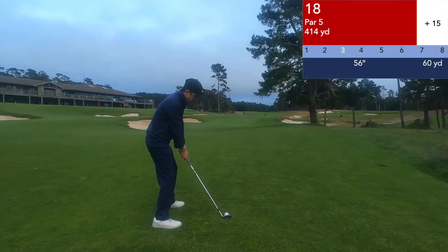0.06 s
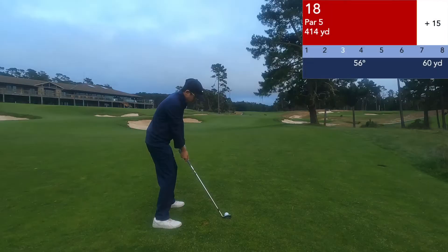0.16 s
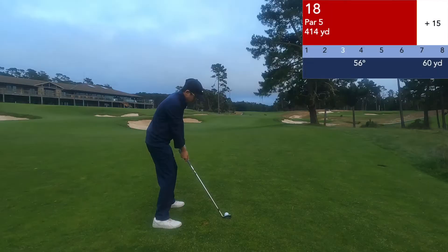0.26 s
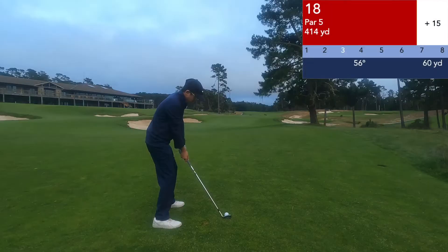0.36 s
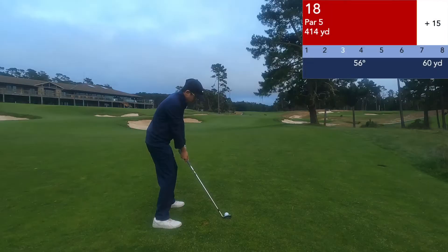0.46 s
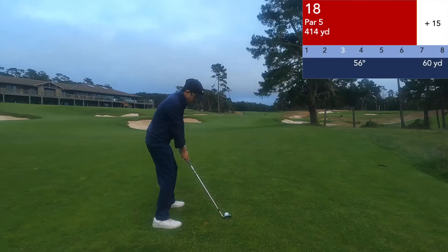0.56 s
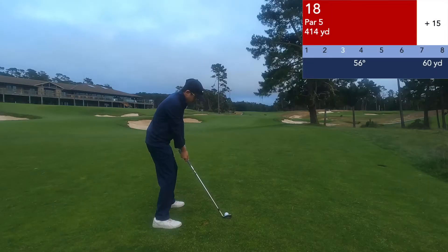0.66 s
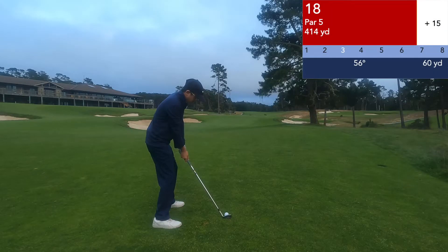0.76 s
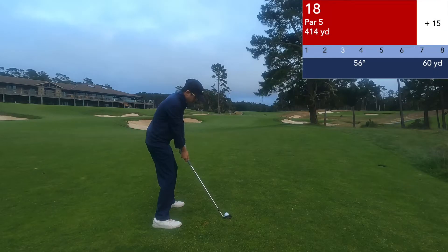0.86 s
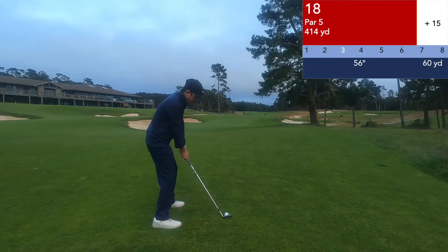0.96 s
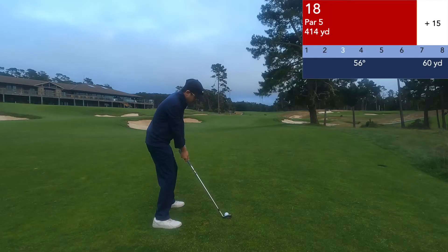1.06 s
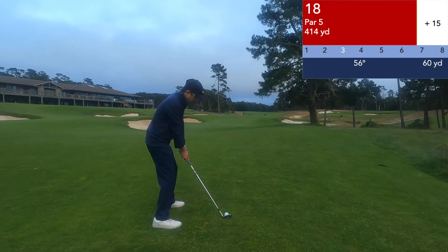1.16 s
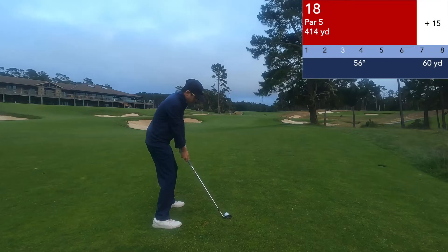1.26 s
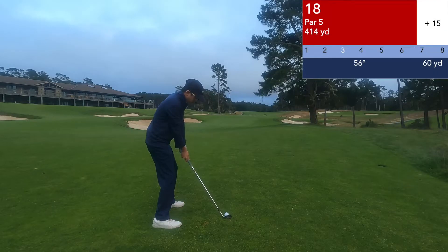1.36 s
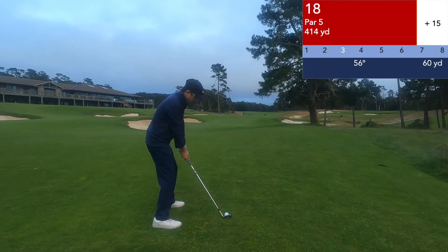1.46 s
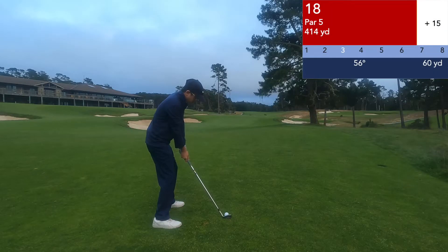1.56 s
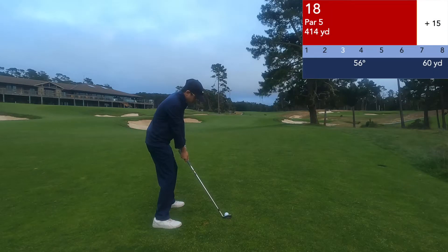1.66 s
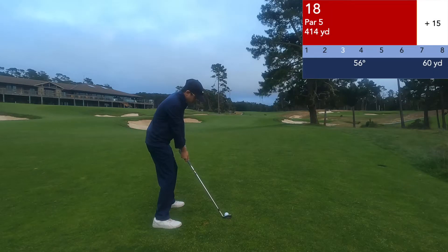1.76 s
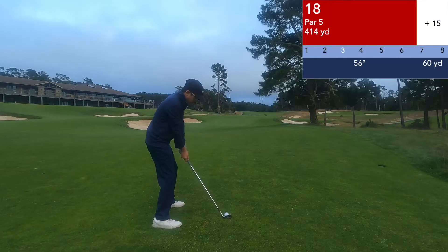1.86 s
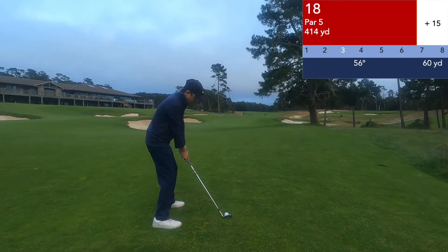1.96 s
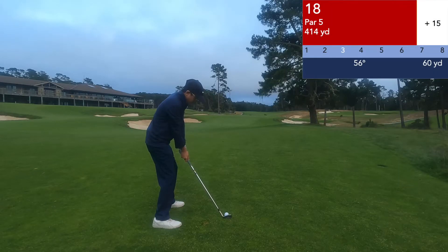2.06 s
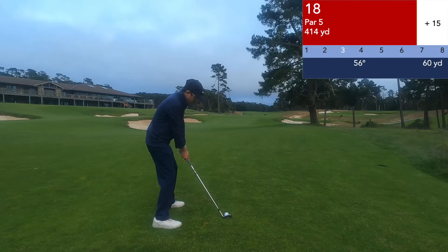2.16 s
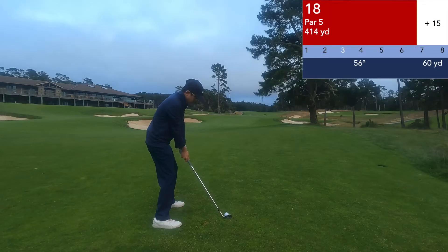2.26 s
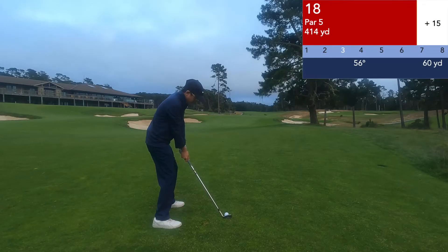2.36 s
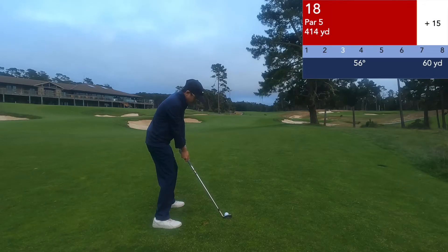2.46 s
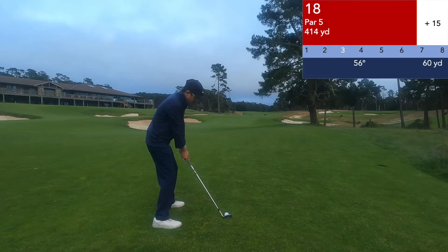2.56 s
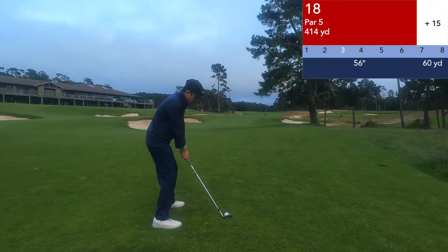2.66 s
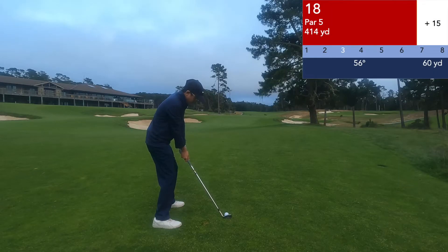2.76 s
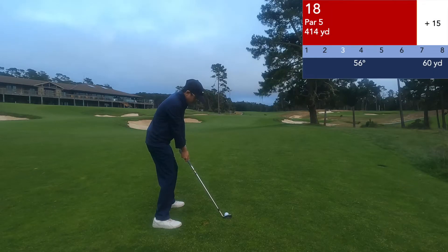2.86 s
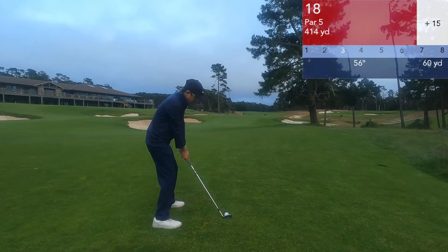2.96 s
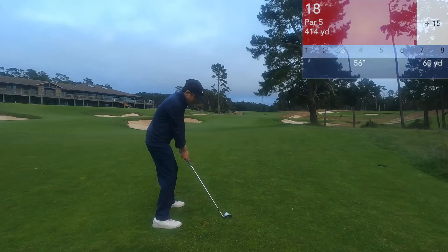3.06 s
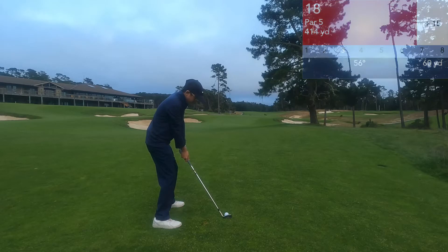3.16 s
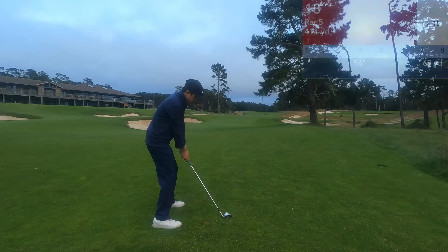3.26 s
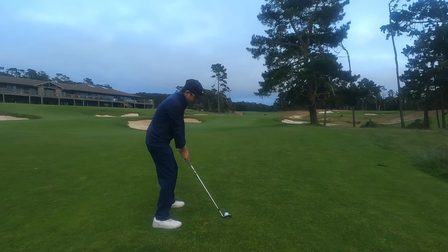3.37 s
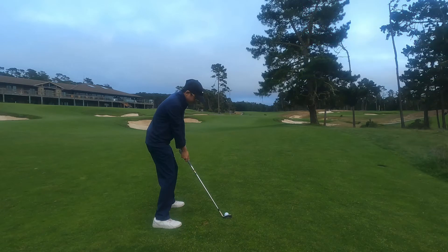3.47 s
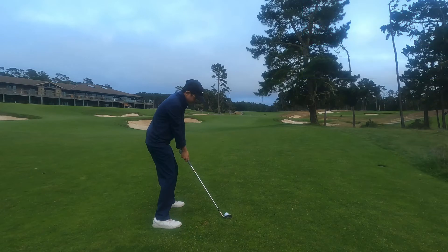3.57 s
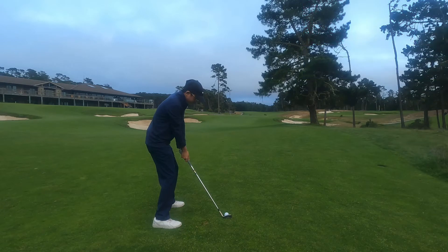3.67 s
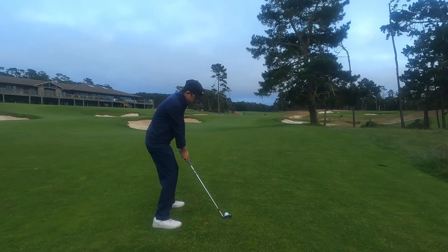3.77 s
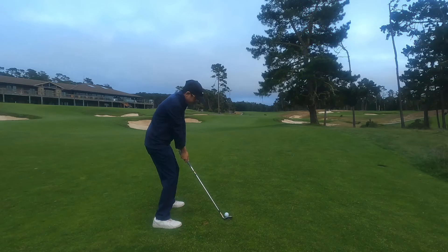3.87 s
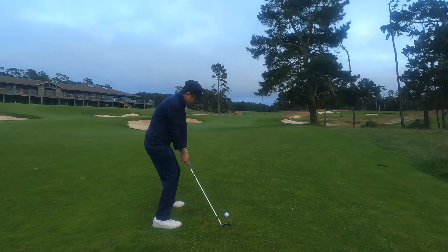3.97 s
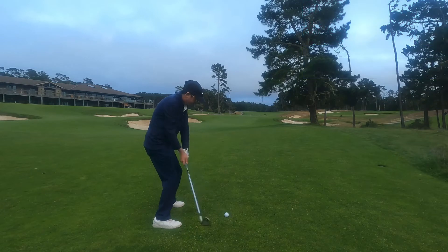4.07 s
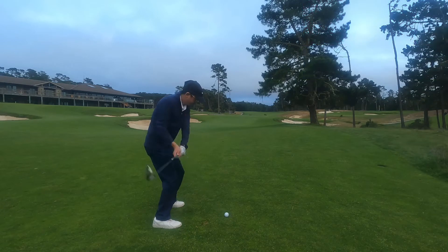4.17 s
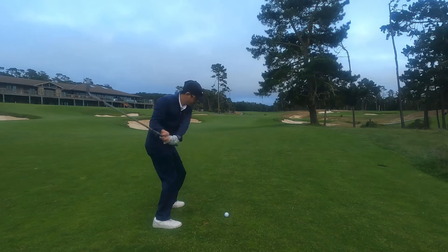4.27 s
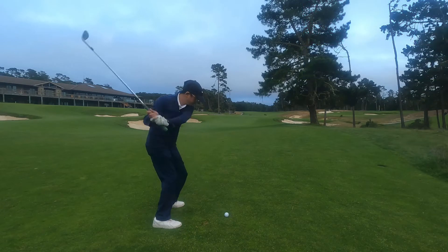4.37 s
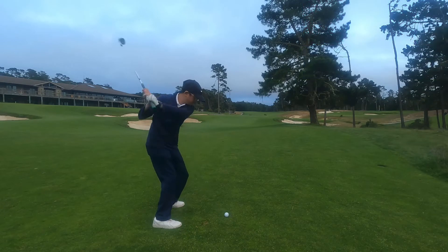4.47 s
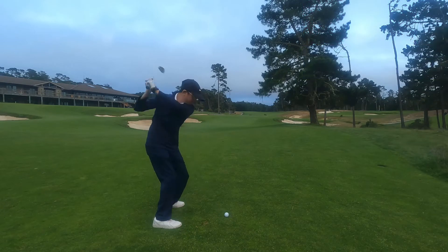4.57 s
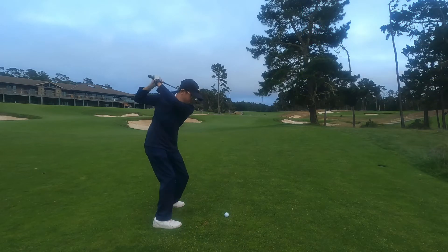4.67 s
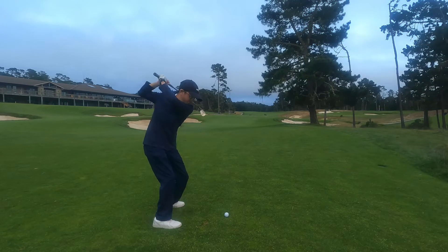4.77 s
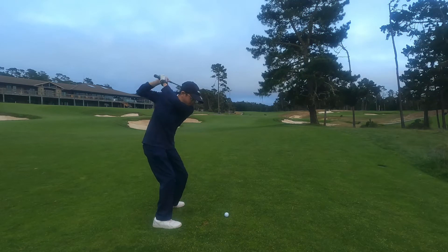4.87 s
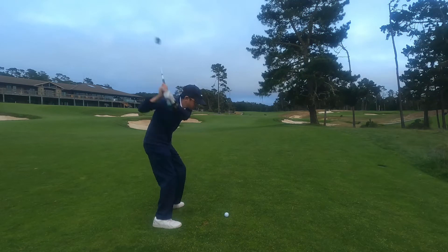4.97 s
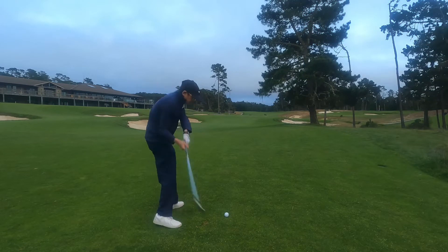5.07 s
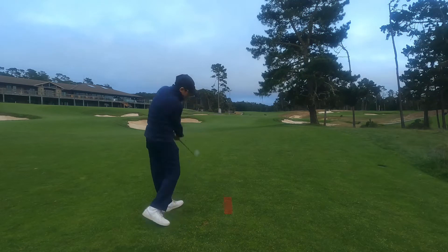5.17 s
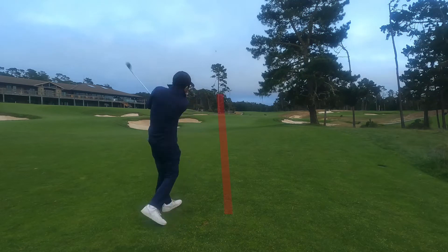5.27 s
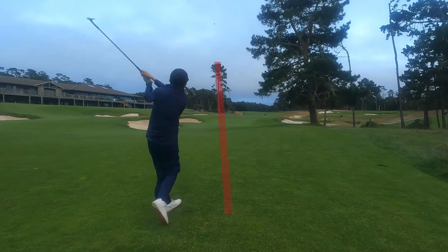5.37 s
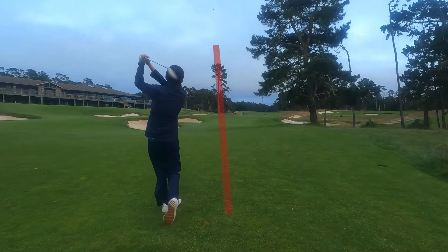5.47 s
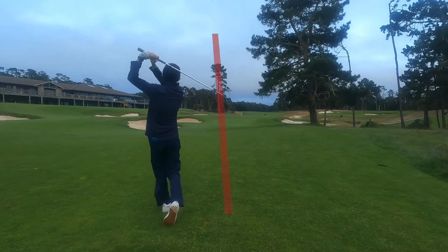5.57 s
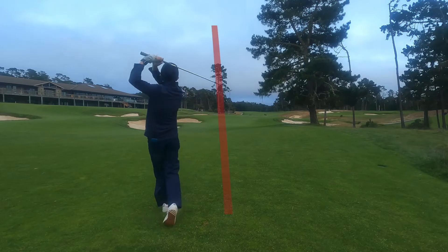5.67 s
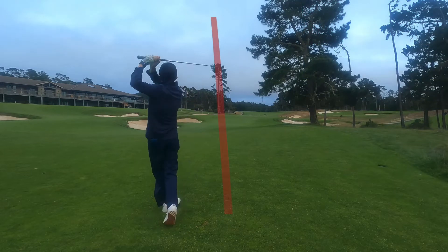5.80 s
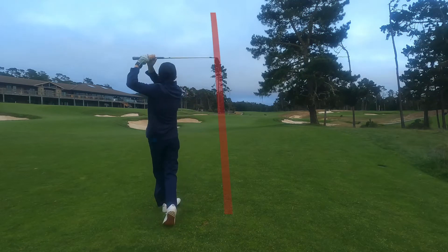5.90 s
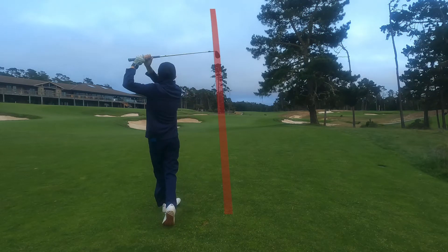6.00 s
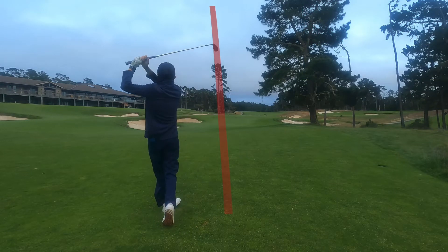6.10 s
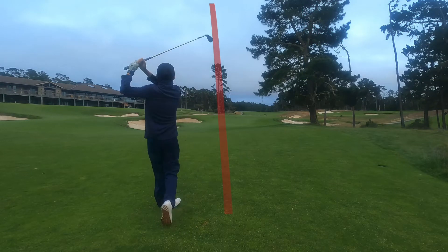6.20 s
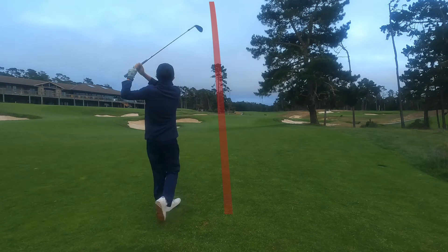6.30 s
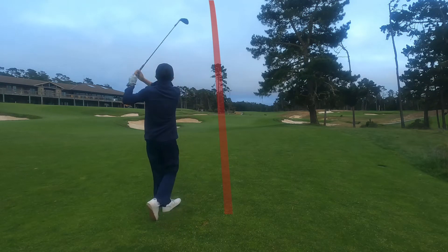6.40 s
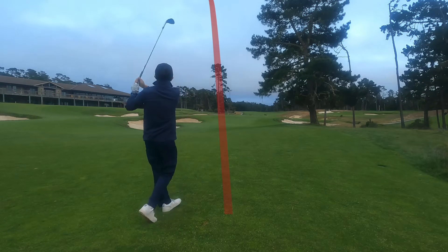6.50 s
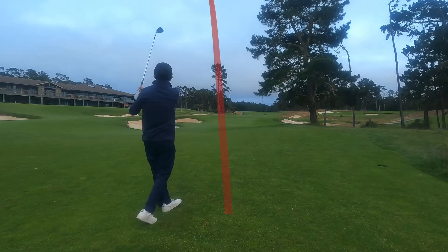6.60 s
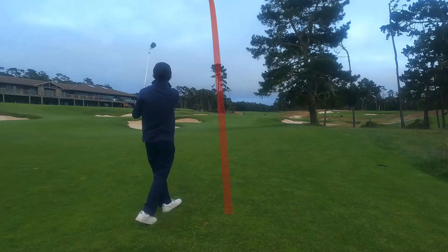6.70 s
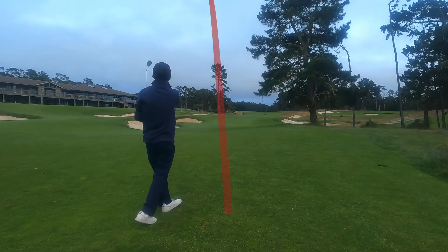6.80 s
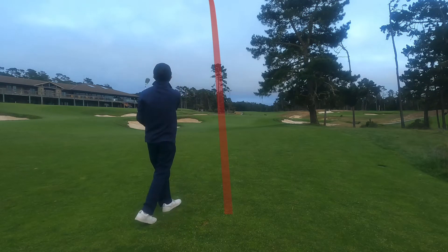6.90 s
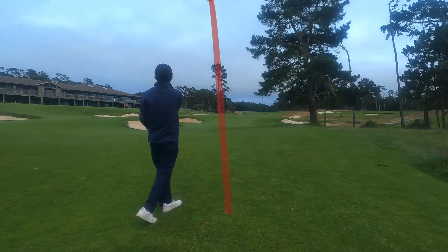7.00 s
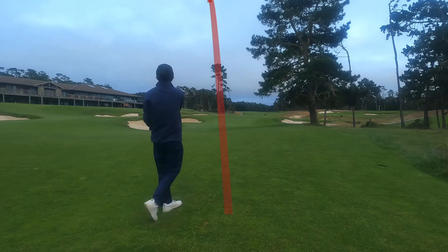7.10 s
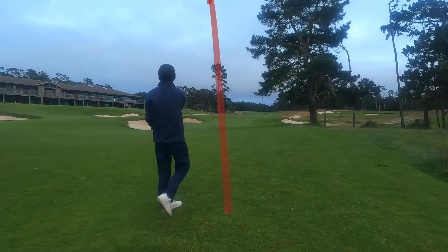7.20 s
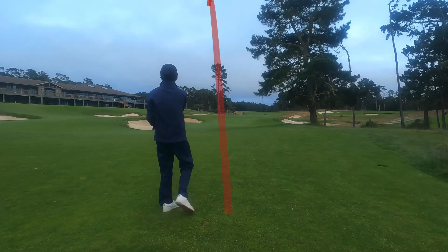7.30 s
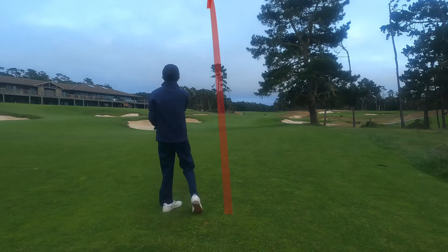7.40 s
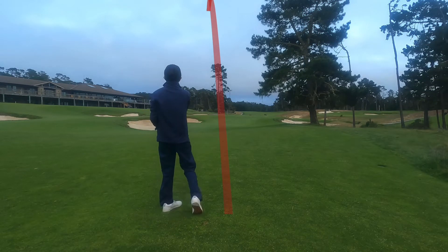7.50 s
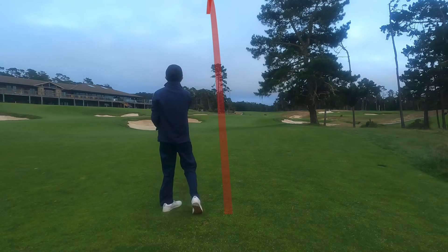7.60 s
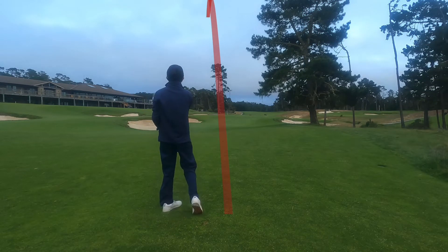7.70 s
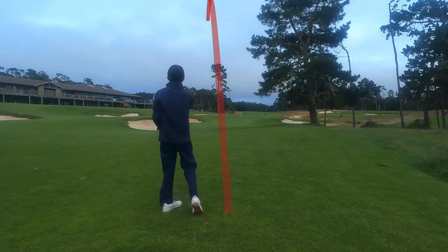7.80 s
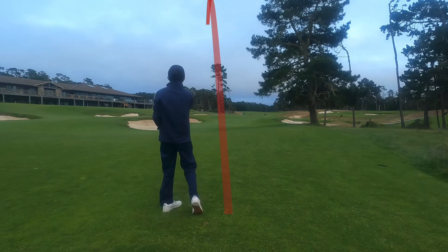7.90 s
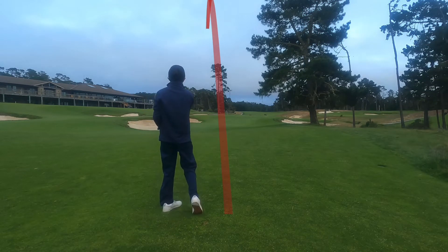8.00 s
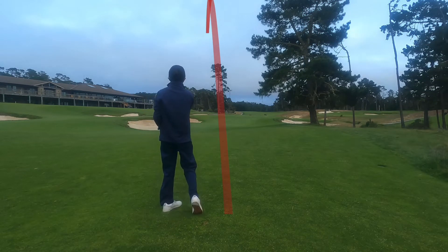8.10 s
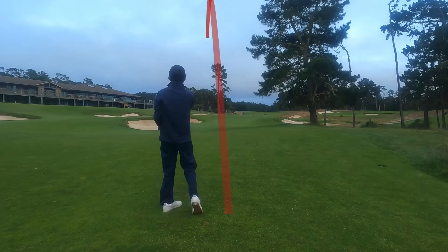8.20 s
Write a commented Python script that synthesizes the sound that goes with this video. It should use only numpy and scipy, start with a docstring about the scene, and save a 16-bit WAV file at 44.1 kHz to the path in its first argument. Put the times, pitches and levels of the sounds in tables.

```python
"""Wedge shot on a fairway

A still, overcast day. Close to the microphone, a little to the left, the shaft swishes down, the face
cracks against the ball, the sole thumps through the turf and loose soil patters back down. Songbirds
whistle and trill from the pines, over a distant low rumble, a few ticks and a faint electrical buzz."""
import sys
import numpy as np
from scipy import signal
from scipy.fft import rfft, irfft
from scipy.io import wavfile
from scipy.ndimage import uniform_filter1d

SR = 44100
rng = np.random.default_rng(int(sys.argv[2]) if len(sys.argv) > 2 else 0)


def store_pcm(level_fs):
    """Save levels as 16-bit WAV."""
    pcm = np.round(np.clip(level_fs, -1, 1) * 32767).astype(np.int16)
    wavfile.write(sys.argv[1], SR, np.atleast_2d(pcm).T)


N = 363774
TIME = np.arange(N) / SR
# where the rumble and the open air sit between the channels: frequency_hz, left_over_right_db
AMBIENCE_PAN = [(100, 0.9), (400, -3), (900, 4), (1500, 1), (2600, 8.5), (4200, -1.5), (8000, 3.5)]


def strike(impact_s=5.15982, contact_s=.0005):
    """Close by, the face presses on the ball for half a millisecond; the sole tears through the turf."""
    # ball and club head: pitch_hz, level_db, t60_s, left_over_right_db
    head_modes = [(550, -23, 0.044, 8), (800, -26, 0.041, 11), (967, -15, 0.04, 8), (1062, -14, 0.015, 11),
                  (1220, -22.5, 0.037, 9), (1385, -33, 0.048, 5), (1794, -28, 0.06, -7),
                  (3060, -32, 0.017, 19), (3500, -26, 0.023, 10), (3970, -28, 0.02, -7),
                  (5030, -34, 0.018, -4), (5360, -27.5, 0.02, -10), (6660, -33, 0.013, -3),
                  (7130, -32, 0.013, -9)]
    # the steel shaft rings on faintly: pitch_hz, level_db, t60_s
    shaft_modes = [(1790, -50, .16), (5400, -53, .06)]
    # tearing turf: frequency_hz, level_db
    divot_colour = [(150, -4), (400, -1), (1100, -1), (1700, -12), (4000, -13.5), (6500, -22),
                    (8500, -33.5), (12000, -39), (16000, -62)]
    # ground under the blow: delay_s, pitch_hz, level_db, t60_s
    ground_modes = [(.0025, 200, -20, .034), (.001, 300, -19, .02), (.017, 210, -26, .055),
                    (.0098, 56, -18, .105), (.0205, 125, -28, .055)]
    dig_s, dig_t60_s = .0085, .03   # the head buries itself in the turf, which smothers its ring
    head = -sum(panned(from_db(db) * ring(impact_s, hz, t60), pan) for hz, db, t60, pan in head_modes)
    pressing = onset(impact_s, contact_s)
    smothered = from_db(-60 * np.clip((TIME - impact_s - dig_s) / dig_t60_s, 0, 2))
    crack = band(head * pressing * smothered, 60, 8100)
    bite_s = impact_s + .00024
    tearing = dying(bite_s, t60=.046) * onset(bite_s, contact_s)
    turf = noise(divot_colour, pan=[(200, 0), (800, 8), (1400, 12), (2500, -2), (7000, 3)])
    divot = from_db(-24) * tearing * turf
    thud = sum((-1) ** k * from_db(db) * ring(impact_s + delay, hz, t60)
               for k, (delay, hz, db, t60) in enumerate(ground_modes))
    shaft = pressing * sum(from_db(db) * ring(impact_s, hz, t60) for hz, db, t60 in shaft_modes)
    sharp = crack + divot + shaft
    echo = from_db(-30.5) * trees(sharp.mean(0), t60=.99, build_s=.059)
    return sharp + band(thud, 30, 770) + echo


def swish():
    """Vortices rise in pitch with speed: the head hums and whooshes, the thin shaft whooshes higher."""
    # club head through the air: time_s, relative_level_db, vortex_pitch_hz
    swing = [(4.97, -70, 250), (5.05, -58, 300), (5.075, -50.5, 350), (5.097, -42.5, 390),
             (5.128, -36, 440), (5.15, -41.5, 430), (5.185, -53, 360), (5.21, -51, 320), (5.235, -58, 300),
             (5.32, -58, 279), (5.45, -80, 250)]
    s, db, hz = np.transpose(swing)
    pitch = np.interp(TIME, s, hz)
    level_db = np.interp(TIME, s, db, left=-120, right=-120)
    hum_level = from_db(3.5 + 2 * drift(110))
    vortices = hum_level * tone(pitch * (1 + .07 * drift(130)))
    for centre in np.geomspace(200, 2016, 11):   # third-octave bands
        head = from_db(-6 - 33 * np.log2(centre / pitch) ** 2)
        shaft = from_db(-3.5 + .45 * (level_db - db.max()) - 18 * np.log2(centre / (2.35 * pitch)) ** 2)
        eddies = band(rng.standard_normal(N), centre / 2 ** (1 / 6), centre * 2 ** (1 / 6))
        vortices += (head + shaft) * unit_rms(eddies)
    hiss = from_db(-14.5) * unit_rms(band(rng.standard_normal(N), 1900, 5800, order=4))
    return panned(from_db(level_db - 8) * (vortices + hiss), 5.5)


def soil():
    """Crumbs of earth and grass blades patter down after the shot."""
    # the shower swells and thins: time_s, level_db
    shower = [(5.16, -85), (5.18, -71), (5.24, -62), (5.285, -53.5), (5.32, -62.5), (5.42, -62.5),
              (5.7, -74), (5.9, -95)]
    # crumbs landing: frequency_hz, level_db
    crumb_colour = [(250, -9), (1100, 12.5), (2500, 3), (5000, -7), (8000, -14), (13000, -54)]
    level = from_db(np.interp(TIME, *np.transpose(shower), left=-120, right=-120))
    clumps = unit_rms(from_db(6 * np.clip(drift(420), -2, 2.2)))
    return panned(level * clumps * noise(crumb_colour), 2)


def whistlers(faint_db=-55.2, left_lag_s=.000064):
    """Songbirds in the pines to the left of the microphone, scattered by near and far trees."""
    # plain gliding whistles: start_s, length_s, first_hz, middle_hz, last_hz, level_db
    whistles = [(0.626, 0.047, 3900, 4000, 3900, -55), (1.733, 0.023, 3130, 3220, 3280, -60),
                (1.779, 0.036, 3850, 3980, 3850, -55), (1.817, .025, 2770, 3070, 3250, -51),
                (2.684, .04, 4130, 4320, 4230, -57), (2.765, 0.052, 2860, 2530, 2300, -59),
                (2.973, 0.058, 2430, 2390, 2180, -56), (2.295, 0.086, 3000, 3160, 3060, -55),
                (3.301, 0.037, 3380, 3430, 3370, -56), (3.401, 0.023, 3920, 3960, 3880, -56),
                (3.424, 0.016, 2680, 2824, 2700, -48), (3.807, 0.038, 4430, 4370, 4330, -58.5),
                (4.107, 0.024, 2330, 2200, 2150, -55), (4.125, .014, 2660, 2780, 2700, -51.5),
                (4.145, .012, 2850, 2700, 2600, -52), (4.154, 0.021, 2330, 2250, 2190, -55),
                (4.262, 0.059, 2420, 2412, 2410, -55.5), (4.4, 0.036, 3350, 3400, 3380, -56),
                (4.455, 0.039, 3650, 3950, 3770, -54.5), (4.778, .04, 4300, 3950, 3540, -57.5),
                (4.877, 0.057, 2553, 2694, 2540, -43), (5.052, .05, 4030, 4000, 3800, -59),
                (5.105, 0.034, 3200, 3390, 3400, -56), (5.231, 0.036, 4760, 4600, 4380, -62),
                (5.263, 0.0255, 4340, 4200, 3900, -52.5), (5.628, .05, 3270, 3180, 2980, -57),
                (5.925, 0.067, 3350, 2940, 2490, -63.5), (6.724, .045, 3320, 3600, 3800, -67),
                (7.225, .055, 2990, 2924, 2680, -58), (7.704, 0.05, 1893, 1955, 1860, -59),
                (8.142, .11, 2850, 2710, 2780, -51)]
    song, distant = piping() + repertoire(), np.zeros(N)
    for s, length, first, middle, last, db in whistles:
        whistle = from_db(db) * note(length, first, middle, last, loudest=.42)
        add(distant if db < faint_db else song, s, whistle)
    # the faint whistles come from deep in the trees and are more blurred
    song += from_db(-3) * distant + from_db(-5) * trees(distant, t60=.3, build_s=.004)[0]
    song *= from_db(2.5 * drift(130))
    near = from_db(-9.5) * trees(song, t60=.26, build_s=.004, delay_s=.005)
    far = from_db(-10.5) * trees(song, t60=1.4, build_s=.01, delay_s=.04)
    left, right = panned(song + near + far, 7)
    return np.array([np.interp(TIME - left_lag_s, TIME, left), right])


def repertoire():
    """Eight kinds of call, each keeping its shape while pace, pitch and level vary."""
    # the course of each call: time_s, pitch_hz, relative_level_db, buzz_depth_hz
    slur = [(0, 3310, -23, 2), (.012, 3300, -9, 12), (.05, 3150, -9, 34), (.084, 2960, 1, 42),
            (.112, 2430, -22.5, 0)]
    warble = [(0, 2780, -6, 0), (.026, 2890, -0.5, 30), (.044, 3400, -1, 117), (.056, 2980, -2, 80),
              (.067, 2900, 0, 58), (.084, 3380, 0, 122), (.1, 3030, 0, 50), (.128, 2890, 2.5, 57),
              (.165, 2680, -10, 0)]
    arch = [(0, 2900, -17, 0), (.01, 3300, -4, 0), (.022, 3470, -4.5, 0.0054), (.038, 3490, -3, 0),
            (.057, 3270, 0, 0), (.078, 2880, 2.5, 0.0041), (.092, 2560, -8, 0)]
    lift = [(0, 2684, -9, -1), (.016, 2930, -0.5, 7), (.03, 2984, 0, 9), (.06, 3024, 0.5, 16),
            (.078, 3200, -1, 86), (.088, 2860, -14, 88)]
    dive = [(0, 3137, -14, 0.0041), (.028, 3740, -18, 0), (.048, 3400, -19, 0), (.066, 2850, 4, 0),
            (.097, 2550, -14.5, 0)]
    flourish = [(0, 3110, -15, 3), (.024, 2810, -6, 2), (.042, 2996, -9, 100), (.056, 3640, -16, 202),
                (.067, 3088, -3, 1), (.08, 2783, 3, 0), (.094, 2490, -20, 0), (.16, 2300, -22.5, 1),
                (.21, 2612, -17, 128), (.28, 2774, -11.5, 163), (.37, 2816, -17.5, 150)]
    chip = [(0, 4300, -2, 0.004), (.022, 3690, -2, 0), (.045, 2950, 0.5, 0)]
    droop = [(0, 2950, 0, 0), (.02, 2720, -3.5, 0), (.045, 2490, -7, 0), (.09, 2460, -12, 20),
             (.15, 2530, -3.5, 20), (.18, 2520, -15, 0)]   # a far call that drops and lingers low
    # each time it is sung: start_s, stretch_factor, pitch_factor, level_db, opening_over_close_db
    slurs = [(0, 1, 1.005, -49, -7), (1.227, 1, 1.02, -48, -6), (6.822, 1.2, 1.01, -48, 16)]
    warbles = [(1.917, 0.92, 0.995, -53, 0), (6.216, 1.0, 0.99, -55, 5), (7.437, 0.97, 1.0, -52.5, 1)]
    arches = [(2.815, 1, 0.99, -41, -1)]
    lifts = [(4.173, 1.0, 1.0, -41.5, 2), (8.081, 0.93, 1.055, -51.5, -2)]
    dives = [(0.619, 1, 1.03, -57, 2), (4.723, 0.99, 1.0, -40.5, 0.14)]
    flourishes = [(2.128, .93, 1.0, -39, 0), (5.319, 0.98, 0.99, -38, 1)]
    chips = [(2.5, 0.69, 1, -60.5, -1), (4.636, 0.5, 0.96, -57.5, -3), (4.949, 0.47, 0.97, -58, 4),
             (5.474, 0.82, 1, -59, 3), (5.771, 0.75, 0.97, -57, -3)]
    droops = [(6.095, 0.86, 1.0, -64, 0), (6.645, 1.07, 1.0, -60.5, 6), (7.055, 1.1, 0.93, -60.5, 4)]
    song = np.zeros(N)
    for shape, renditions in [(slur, slurs), (warble, warbles), (arch, arches), (lift, lifts),
                              (dive, dives), (flourish, flourishes), (chip, chips), (droop, droops)]:
        for s, stretch, pitch, db, lead_db in renditions:
            add(song, s, from_db(db) * call(shape, stretch, pitch, lead_db))
    return song


def call(shape, stretch, pitch, lead_db, buzz_rate_hz=94):
    """One bird call: a pure tone slides through the shape, and a buzz shakes its pitch."""
    s, *columns = np.transpose(shape)
    t = TIME[:int(s[-1] * stretch * SR)]
    hz, db, depth_hz = [uniform_filter1d(np.interp(t, s * stretch, c), size=260) for c in columns]
    quaver = np.interp(t * 300, np.arange(150), rng.standard_normal(150))
    shake_hz = depth_hz * np.sin(2 * np.pi * buzz_rate_hz * t + .5 * quaver)
    fade = np.clip(np.minimum(t, t[-1] - t) / .004, 0, 1)
    level = from_db(db + lead_db * (.5 - t / t[-1]))
    return np.sqrt(2) * fade * level * tone(pitch * hz + shake_hz + 38 * quaver)


def piping(start_s=3.373, gap_s=.086, count=4):
    """A bird pipes arched notes at an even pace, each longer, lower and softer than the last."""
    song = np.zeros(N)
    for k in range(count):
        hz = 2714 - 60.4 * k
        held = note(.048 + .011 * k, hz - 45, hz, hz - 100, loudest=.37)
        add(song, start_s + k * gap_s, from_db(-42 - 5 * k) * held)
    return song


def triller(swell_s=.12, fade_s=.22):
    """A bird a little to the right: each trill swells in, slows slightly and fades."""
    # trills: start_s, end_s, first_gap_s, gap_growth_s, level_db, soft_start_db, soft_end_db
    trills = [(1.779, 2.95, .1221, .00065, -49, -5.5, -6.5), (6.34, 7.895, .1197, .001, -51, -10, -2.5)]
    song = np.zeros(N)
    for start, end, gap, growth, db, soft_db, fade_db in trills:
        times = start + np.concatenate([[0], np.cumsum(gap + growth * np.arange(20))])
        for s, chance in zip(times[times < end], rng.standard_normal((20, 6))):
            # a syllable is a falling sweep, then a higher, fainter one with a hook; no two are alike
            sharp, slow, strong, high_strong, bow, accent = 1 + chance * [.008, .06, .06, .11, .012, .15]
            sweep = note(.035 * slow, 5520 * sharp, 5020 * sharp * bow, 4320 * sharp, .72 * accent)
            high_sweep = note(.021 * slow, 7450, 6900 * bow, 5750, loudest=.9 * accent)
            hook = note(.012, 6020 * sharp, 5830 * sharp, 5950 * sharp * bow, loudest=.35)
            ends_db = soft_db * np.exp((start - s) / swell_s) + fade_db * np.exp((s - end) / fade_s)
            level = from_db(db + ends_db)
            high_level, hook_s = level * high_strong * from_db(-11.5), s + .06
            add(song, s - .018, level * strong * sweep)
            add(song, hook_s - .017, high_level * high_sweep)
            add(song, hook_s, high_level * from_db(1) * hook)
    song *= from_db(-.4 + 1.6 * drift(220))
    return panned(song + from_db(-5.5) * trees(song, t60=.29, build_s=.0075), -2.4)


def far_birds(count=220):
    """Faint slurred chatter from deeper in the wood, blurred by the trees."""
    # the chorus rises and falls: time_s, relative_level_db
    chorus = [(0, -75), (1.3, -64), (1.8, -57), (3.3, -58), (4.0, -61), (5.0, -58), (6.0, -60), (7.1, -56),
              (8.2, -63)]
    song = np.zeros(N)
    for k, (when, length, pitch, slur, arch) in enumerate(rng.random((count, 5))):
        hz = 2560 + 1400 * pitch ** 2
        fall, bend = .6 * (slur - .42), .15 * (arch - .25)
        chirp = note(.026 + .0304 * length, hz * (1 + fall / 2), hz * (1 + bend), hz * (1 - fall / 2),
                     loudest=.5, quaver_hz=80)
        add(song, (k + when) / count * N / SR, from_db(-3 * pitch) * chirp)
    song *= from_db(np.interp(TIME, *np.transpose(chorus)))
    return panned(from_db(-10) * song + from_db(-5) * trees(song, t60=.4, build_s=.004), 4)


def ticks(snap_t60_s=.0079, rustle_db=-14):
    """A few faint ticks before the shot, each a tiny snap with a soft rustle after it."""
    # small dry ticks: start_s, level_db, rustle_t60_s
    snaps = [(0.543, -56.5, 0.037), (1.352, -52, 0.1), (3.526, -43, .1), (3.5455, -54, .2),
             (3.902, -54, 0.076), (3.959, -51.5, .04), (4.44, -47.5, 0.12)]
    # their bright spectrum: frequency_hz, level_db
    snap_colour = [(2000, -10), (4500, 5.5), (6800, -2), (8500, -8), (12000, -24), (14000, -38)]
    level = sum(from_db(db) * (dying(s, snap_t60_s) + from_db(rustle_db) * dying(s, t60))
                for s, db, t60 in snaps)
    return band(level * noise(snap_colour), 2000, 11000, order=5)


def rumble():
    """A steady low rumble from far off."""
    # its spectrum: frequency_hz, level_db
    rumble_colour = [(20, -30.5), (32, -9), (45, -8.5), (57, -5), (75, -15), (110, -7), (150, -11.5),
                     (200, -14), (260, -23.5), (350, -28.5), (500, -48.5)]
    return from_db(-53.5) * band(noise(rumble_colour, AMBIENCE_PAN), 33, 900)


def drone():
    """A narrow, low drone swells and wavers within the rumble."""
    # its swells: time_s, level_db
    swells = [(0.0, -52.5), (0.3, -46), (0.54, -54), (0.8, -46), (0.96, -57), (2.66, -48), (2.86, -56.5),
              (4.88, -48.5), (5.26, -51.5), (5.96, -56.5), (6.14, -48), (6.94, -51.5), (7.34, -49),
              (7.58, -54.5), (7.84, -45), (8.24, -76)]
    hum = band(rng.standard_normal(N), 53.2, 61.2)
    even_hum = hum / np.sqrt(uniform_filter1d(hum ** 2, size=SR // 4) + 1e-12)
    return even_hum * from_db(np.interp(TIME, *np.transpose(swells)) + 2.1 * drift(9.7))


def open_air():
    """The soft hiss of the open course all around the microphone."""
    # its spectrum: frequency_hz, level_db
    air_colour = [(200, -17), (350, -9.5), (650, -4), (830, -7.5), (1000, 1.5), (1500, -3.5), (1750, -1),
                  (2500, -9.5), (2950, -7), (4200, -7.5), (5000, -3), (5800, -15.5), (7500, -24),
                  (8400, -33.5), (11000, -36), (14000, -56.5)]
    return from_db(-60 + .18 * drift(2.7)) * noise(air_colour, AMBIENCE_PAN)


def buzz(rate_hz=59.94):
    """A very faint electrical buzz: tiny clicks, strong and weak in turn."""
    at = (np.arange(0, TIME[-1], 1 / rate_hz) * SR).astype(int)
    clicks = np.zeros(N)
    clicks[at] = -from_db(-3 * (np.arange(len(at)) % 2) + 1.8 * rng.standard_normal(len(at)))
    return panned(from_db(-67.5) * unit_rms(band(clicks, 1060, 3980, order=3)), 2)


def trees(x, t60, build_s, delay_s=0):
    """Trunks and branches scatter echoes that build up and fade, different on each side."""
    t = np.maximum(TIME[:2 * SR] - delay_s, 0)
    shared, own = rng.standard_normal(len(t)), rng.standard_normal((2, len(t)))
    echoes = (shared + own) * from_db(-60 * t / t60) * (1 - np.exp(-t / build_s))
    return signal.fftconvolve(x[None], unit_rms(echoes) / np.sqrt(len(t)), axes=1)[:, :N]


def note(length_s, first_hz, middle_hz, last_hz, loudest, quaver_hz=22):
    """A quavering tone arches through three pitches and peaks at the fraction `loudest` of its length."""
    t = TIME[:int(length_s * SR)]
    progress = t / length_s
    hz = np.polyval(np.polyfit([0, .5, 1], [first_hz, middle_hz, last_hz], 2), progress)
    quaver = np.interp(t * 300, np.arange(100), rng.standard_normal(100))
    skewed = np.interp(progress, [0, np.clip(loudest, .1, .9), 1], [0, .5, 1])
    swell = np.abs(np.sin(np.pi * skewed)) ** .9
    return np.sqrt(2) * swell * tone(hz + quaver_hz * quaver)


def noise(colour, pan=((100, 0), (1000, 0))):
    """Coloured stereo noise, most alike in the two channels in the deep bass and near 5 kHz."""
    # likeness of left and right at the microphone: frequency_hz, correlation
    likeness = [(60, 0.98), (150, 0.86), (400, 0.52), (1000, 0.79), (2500, 0.51), (5000, 0.96),
                (10000, 0.52)]
    hz = np.arange(N // 2 + 1) * SR / N
    mid, side = rfft(rng.standard_normal((2, N)))
    alike = at_hz(likeness, hz)
    pair = np.sqrt(1 + alike) * mid + np.sqrt(1 - alike) * side * [[1], [-1]]
    return unit_rms(irfft(panned(pair, at_hz(pan, hz)) * from_db(at_hz(colour, hz)), N))


def ring(s, hz, t60):
    """A mode struck at time s."""
    return dying(s, t60) * np.sin(2 * np.pi * hz * (TIME - s))


def dying(s, t60):
    """Envelope that starts at s and falls 60 dB in t60 seconds."""
    age = TIME - s
    return (age >= 0) * from_db(-60 * np.clip(age / t60, 0, 5))


def onset(s, rise_s):
    """Smooth rise from 0 to 1, starting at s."""
    return np.sin(np.pi / 2 * np.clip((TIME - s) / rise_s, 0, 1)) ** 2


def tone(hz):
    """A sine that follows a pitch curve."""
    return np.sin(2 * np.pi * np.cumsum(hz) / SR)


def drift(rate_hz):
    """A random wander through rate_hz new values a second."""
    knots = rng.standard_normal(4000)
    return np.interp(TIME * rate_hz, np.arange(len(knots)), knots)


def band(x, low_hz, high_hz, order=2):
    """Causal band-pass."""
    sos = signal.butter(order, [low_hz, high_hz], "band", fs=SR, output="sos")
    return signal.sosfilt(sos, x + 1e-18)


def at_hz(points, hz):
    """Read a spectrum on a log-frequency axis."""
    f, value = np.transpose(points)
    return np.interp(np.log(hz + 1), np.log(f), value)


def add(track, s, sound):
    """Mix a sound into a track from time s on."""
    i = int(np.clip(round(s * SR), 0, N - 1))
    track[..., i:i + sound.shape[-1]] += sound[..., :N - i]


def panned(x, pan_db):
    """Place a sound by level difference; positive is to the left."""
    return x * from_db(np.array([[.5], [-.5]]) * pan_db)


def unit_rms(x):
    """Scale to unit power."""
    return x / np.sqrt(np.mean(x ** 2) + 1e-20)


def from_db(db):
    """Decibels to gain."""
    return 10 ** (np.asarray(db) / 20)


def scene():
    """The shot up close, the birds in the pines and the open course beyond."""
    shot = strike() + swish() + soil()
    birds = whistlers() + triller() + far_birds()
    return shot + birds + ticks() + rumble() + drone() + open_air() + buzz()


def record(dry, cutoff_hz=15500):
    """The microphone signal, with the top of the treble cut steeply."""
    return signal.sosfilt(signal.butter(16, cutoff_hz, fs=SR, output="sos"), dry)


dry = scene()
out = record(dry)
store_pcm(out)
```